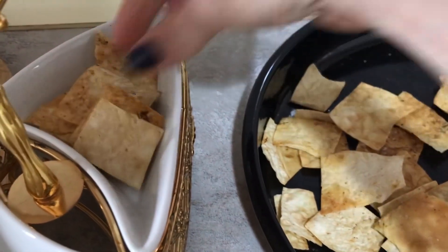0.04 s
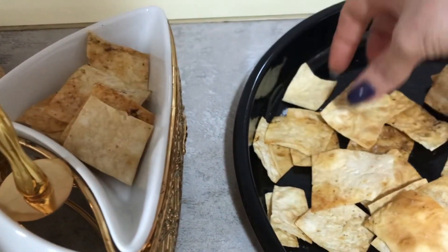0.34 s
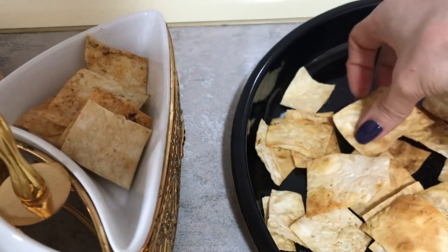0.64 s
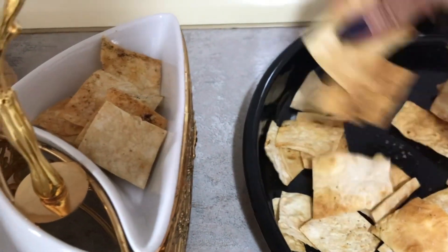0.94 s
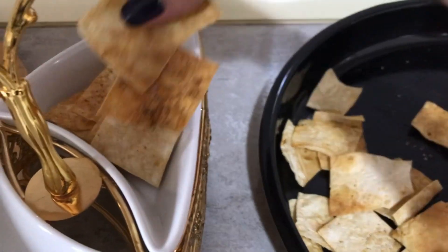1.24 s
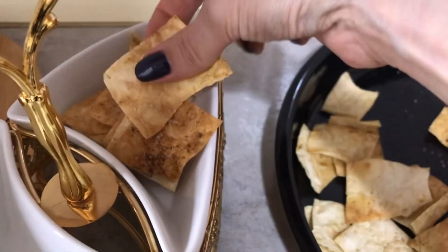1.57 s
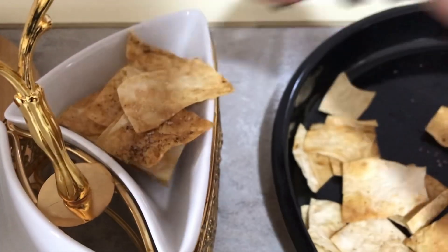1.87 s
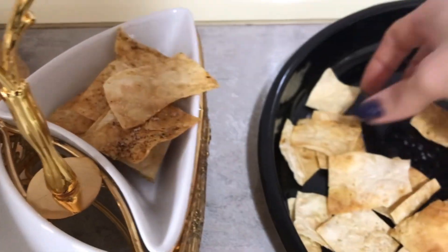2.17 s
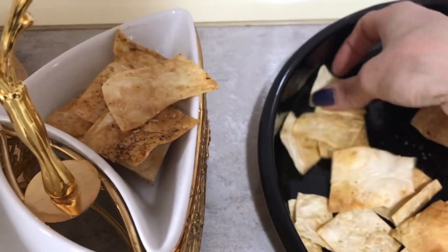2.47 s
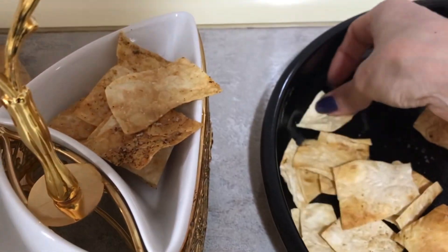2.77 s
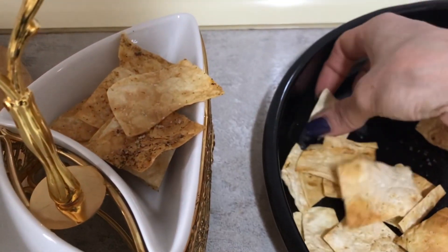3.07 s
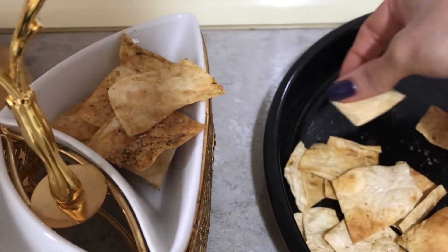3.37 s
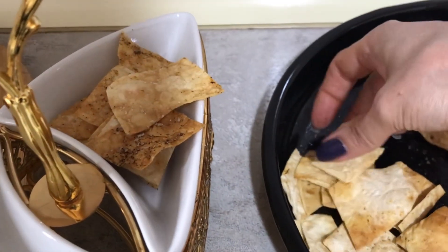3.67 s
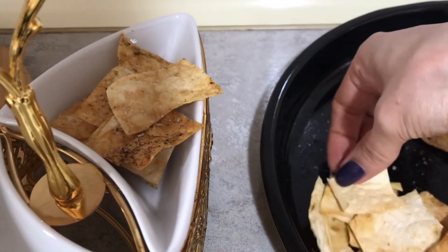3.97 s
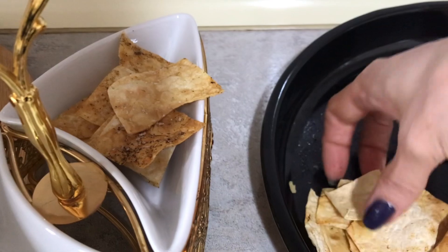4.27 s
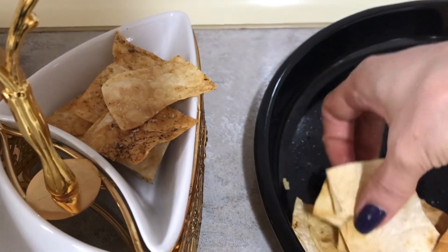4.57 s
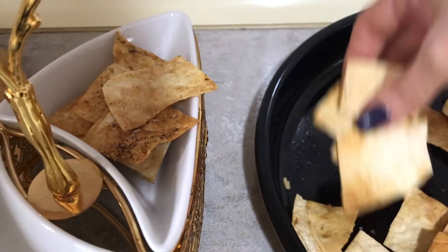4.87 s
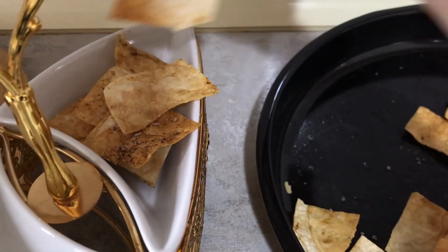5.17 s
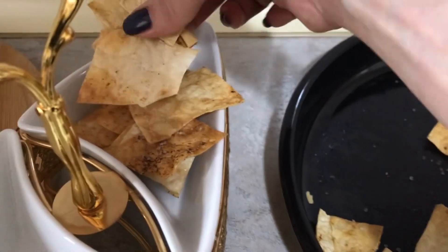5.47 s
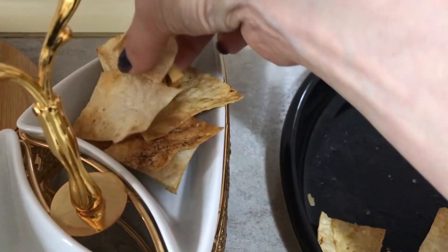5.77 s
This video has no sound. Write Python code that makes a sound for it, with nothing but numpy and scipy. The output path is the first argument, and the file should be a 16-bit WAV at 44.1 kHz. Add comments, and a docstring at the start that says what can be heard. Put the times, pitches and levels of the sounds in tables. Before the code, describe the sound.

Close by in a small kitchen, brittle crisps rustle and click as fingers pick them off a baking tray. One snaps as they are set down in a ceramic dish. More are scraped together, crackling busily while the metal knocks and rings faintly, then settle on the pile with light ticks and a soft, low bump of the dish. A faint hiss and a low appliance hum lie underneath.

```python
"""Dry baked crisps are gathered by hand from a baking tray and laid on a heap in a ceramic dish.
Their surfaces catch and slip many times a second, so they scrape, tick and crumble; a few crack sharply.
The metal tray drums and rings faintly under them, and the dish thuds softly when it is nudged.
Behind it all are a small kitchen's short echo, a faint hiss of air and the low hum of an appliance."""
import sys
import numpy as np
from scipy import signal
from scipy.fft import rfft, irfft, next_fast_len
from scipy.io import wavfile
from scipy.ndimage import uniform_filter1d, map_coordinates

SR = 44100
rng = np.random.default_rng(int(sys.argv[2]) if len(sys.argv) > 2 else 0)


def materialize(psi):
    """Save the field psi as 16-bit PCM at rate SR to the path in sys.argv[1].

    A 1-D psi becomes a single channel; in a 2-D psi each row is a channel.
    """
    bounded = np.clip(np.atleast_2d(psi).T, -1, 1)
    quanta = np.round(bounded * 32767).astype(np.int16)
    wavfile.write(sys.argv[1], SR, quanta)


N = 265482

# Levels are relative. A fade is the time a sound takes to drop by 60 dB.
# tone of the kitchen air: f/Hz, level/dB
AIR_TONE = [(25, -22), (60, -3.5), (110, -1), (220, -10.5), (460, -15), (2000, -26.5), (16000, -33.5)]
# loudness of the appliance over time: t/s, level/dB
HUM_LEVELS = [(0, -69), (2.2, -57), (4.1, -64.5), (6.02, -66.5)]
# how long the kitchen echoes: f/Hz, fade/s
ROOM_FADES = [(1000, 0.53), (15000, 0.29)]
# fingers and crisps nudging the dish: t/s, f/Hz, level/dB, fade/s
DISH_NUDGES = [(0.016, 270.6, -48, 0.43), (1.393, 293, -46.5, 0.1), (5.947, 74.6, -28, 0.31)]
# the notes the metal tray rings with: f/Hz, level/dB, fade/s
TRAY_NOTES = [(410, 10, .07), (905, 6, .1), (1107, 0, .65), (1290, -6, .25), (1506, -8, .95),
              (1895, -8, .7), (2155, -9, .35), (2846, -11, .55), (3234, -6, .3)]
# low notes of the tray's floor flexing on the counter: f/Hz, width/Hz, level/dB
FLOOR_NOTES = [(109, 16.6, -0.5), (136, 43, -11.5), (185, 11, -8.5)]
# the hand leaning on the tray: t/s, length/s, level/dB
HAND_PRESSES = [(0.575, 0.096, -48), (0.92, 0.097, -53), (2.5, 0.33, -55.5), (3.62, 0.18, -60),
                (3.87, 0.26, -54.5), (4.41, 0.44, -59)]
# a crisp flicking bare metal: t/s, level/dB, muted below f/Hz
TRAY_FLICKS = [(1.07, -52, 2070), (2.66, -45, 1250)]
# crisps set down on the tray: t/s, floor f/Hz, floor level/dB, wall level/dB
TRAY_KNOCKS = [(2.523, 402, -41, -56), (2.655, 395, -42, -52), (2.868, 420, -47, -61),
               (3.148, 340, -47, -41.5), (3.671, 412, -44, -41.5), (3.889, 452, -40.5, -49),
               (4.441, 373, -45, -44.5)]
# a crisp dragged on its edge: t/s, length/s, f/Hz, level/dB
EDGE_DRAGS = [(0.509, 0.099, 4400, -55), (2.474, 0.065, 3680, -50), (4.69, 0.08, 4430, -52)]
# crisps breaking, the first in four steps: t/s, level/dB
CRACK_STEPS = [(1.4487, -41.5), (1.4593, -37), (1.4668, -28.5), (1.4688, -21), (3.3436, -49), (3.9718, -44),
               (4.4388, -31), (5.5436, -47), (3.3436, -53), (3.9718, -43), (4.4388, -35), (5.5436, -52.5)]
# the notes of a breaking crisp: f/Hz, width/Hz, level/dB
SHARD_NOTES = [(3600, 2200, -14), (5310, 420, -4), (6440, 520, -1), (7290, 79, -0.5), (8900, 1200, -21),
               (11600, 1100, 4), (12900, 8500, -1.5)]
# tones of rubbing surfaces (rasp), whole crisps (body) and an edge letting go (snap): f/Hz, level/dB
TRAY_RASP_TONE = [(1100, -43.5), (2200, -5.5), (3000, 1), (4200, 0), (5000, -3.5), (6300, -1.5), (8800, -3),
                  (10400, -4.5), (12500, -3.5), (15000, -2), (16000, -18)]
DISH_RASP_TONE = [(1100, -34), (2200, -8.5), (3400, -3.5), (4600, -4), (6300, -2.5), (8000, -10.5),
                  (10500, -11.5), (12400, -6), (16000, -13)]
TRAY_BODY_TONE = [(140, -4), (250, -6), (430, 1.5), (600, -9.5), (900, 1), (1500, 0), (2100, -1),
                  (3200, -22)]
DISH_BODY_TONE = [(120, 0), (260, 4), (520, -13), (900, -10.5), (1300, 3), (2100, -4.5), (3200, -13.5)]
SNAP_TONE = [(1100, -25.5), (2200, -5), (3300, 1.5), (6500, -1), (8800, 1.5), (10300, -2), (12500, 2),
             (16000, -8.5)]
# fingers pushing the crisps along: t/s, length/s, rasp level/dB, body level/dB
TRAY_PUSHES = [(0.47, 0.13, -50, -57.5), (0.575, 0.081, -44.5, -53.5), (0.73, 0.228, -48, -63.5),
               (0.89, 0.17, -45.5, -52.5), (2.462, 0.08, -44, -56), (2.56, 0.12, -47, -55.5),
               (2.65, 0.034, -37.5, -46), (2.72, 0.051, -54, -63), (2.88, 0.02, -45, -59),
               (2.94, 0.11, -61, -62.5), (3.1, 0.18, -48, -56.5), (3.34, 0.041, -49.5, -71),
               (3.46, 0.043, -62, -71), (3.602, 0.021, -55, -54.5), (3.665, 0.28, -46, -55),
               (3.88, 0.22, -40.5, -49), (4.225, 0.0077, -44, -55.5), (4.3, 0.076, -54, -56.5),
               (4.365, 0.088, -48.5, -58), (4.41, 0.066, -37, -49), (4.48, 0.27, -44.5, -53.5),
               (4.79, 0.015, -49.5, -65)]
DISH_PUSHES = [(-0.01, 0.03, -41, -49.5), (0.08, 0.0093, -54.5, -74), (1.435, 0.031, -50.5, -52),
               (1.595, 0.06, -52.5, -62), (1.78, 0.027, -58, -67), (1.862, 0.1, -53.5, -59.5),
               (2.01, 0.026, -58, -63.5), (5.3, 0.16, -70, -79), (5.505, 0.069, -59, -76),
               (5.62, 0.0043, -44.5, -57), (5.67, 0.097, -56.5, -67), (5.745, 0.075, -44.5, -52),
               (5.83, 0.19, -51, -56), (5.96, 0.042, -41, -49)]
# edges catching: t/s, snap level/dB, knock level/dB, crumble fade/s, the crisp's main note f/Hz
TRAY_CATCHES = [(0.612, -39.5, -50, .045, 4400), (0.855, -38.5, -48.5, 0.061, 8500),
                (0.912, -34.5, -57.5, 0.044, 7400), (0.928, -34.5, -43, .033, 8600),
                (0.995, -37.5, -46, 0.031, 6510), (2.523, -37.5, -48.5, .038, 3730),
                (2.5866, -40.5, -59, 0.03, 13400), (2.6545, -32, -55, 0.084, 5570),
                (2.8026, -41.5, -43.5, .055, 3420), (2.8655, -37, -54, .035, 8500),
                (2.8852, -37, -57, 0.022, 8700), (2.9827, -44.5, -53, 0.016, 14500),
                (3.12, -36, -45.5, .02, 7360), (3.1473, -36, -45.5, 0.046, 4600),
                (3.2032, -38, -47, 0.032, 4400), (3.2631, -40.5, -57, 0.041, 11400),
                (3.3434, -44, -71, 0.037, 13800), (3.6567, -37, -62, .02, 3300),
                (3.6692, -32.5, -40, 0.16, 3300), (3.8882, -33, -49, 0.14, 4330),
                (3.958, -32, -61, 0.086, 3000), (3.97, -29, -56, .11, 14600),
                (4.0268, -31.5, -56, .025, 11300), (4.036, -34.5, -59.5, .025, 12500),
                (4.4386, -27, -40.5, 0.031, 7600), (4.469, -38.5, -49, .05, 5000),
                (4.6908, -36, -57, 0.084, 9600), (4.765, -37.5, -53, 0.048, 4200)]
DISH_CATCHES = [(1.1539, -56, -77, .01, 12900), (1.204, -53.5, -62, .01, 12600),
                (1.3943, -49.5, -48, 0.18, 3250), (1.6039, -42, -51.5, 0.21, 5850),
                (1.8059, -44, -46.5, 0.028, 15600), (1.8678, -45.5, -48, 0.086, 2570),
                (1.9047, -47.5, -44, .03, 4920), (4.9857, -45, -83, 0.024, 4650),
                (5.0156, -51, -73, 0.012, 4770), (5.3454, -49.5, -65, 0.059, 6230),
                (5.5365, -45, -70, 0.0056, 11600), (5.5434, -38, -53, 0.025, 11700),
                (5.5708, -40.5, -57, 0.073, 5850), (5.6217, -36.5, -53, 0.037, 3680),
                (5.711, -40, -50, 0.018, 13700), (5.9834, -41, -39.5, 0.013, 6600)]

GRIP_S, EASE_DB_PER_S = 0.0082, 6  # a push takes hold quickly, then eases off
RASP_SETTLE_DB_PER_S, BODY_SETTLE_DB_PER_S = 295, 180.5  # the rasp stops before whole crisps come to rest


def amp(db):
    """Turn decibels into a number to multiply by."""
    return 10 ** (np.asarray(db) / 20)


def unit(x):
    """Scale a sound to an average power of 1."""
    return x / np.sqrt(np.mean(x ** 2) + 1e-20)


def burst(x):
    """Scale a short sound to the energy of 10 ms at power 1."""
    return x * np.sqrt(SR / 100 / np.sum(x ** 2))


def along(points, hz):
    """Read between the rows of a (frequency, value) table, with octaves evenly spaced."""
    freqs, values = np.transpose(points)
    return np.interp(np.log(hz + 1), np.log(freqs + 1), values)


def wobble(rate):
    """A smooth curve through `rate` random values a second."""
    points = rng.standard_normal(int(N * rate / SR) + 4)
    coarse = map_coordinates(points, [np.arange(0, N + 32, 32) * rate / SR])
    return np.interp(np.arange(N) / 32, np.arange(len(coarse)), coarse)


def add(track, start, sound):
    """Mix a sound into a track at `start` seconds."""
    part = track[max(round(start * SR), 0):][:len(sound)]
    part += sound[:len(part)]


def through(x, response):
    """Pass a sound through an object, given that object's response to one tap."""
    return signal.oaconvolve(x, response)[:len(x)]


def resonances(notes, size=16384):
    """The response to one tap of an object with these notes; wider notes die sooner."""
    f = np.fft.rfftfreq(size, 1 / SR)
    return irfft(sum((-1) ** k * amp(db) * 1j * f * width / (hz * hz - f * f + 1j * f * width)
                     for k, (hz, width, db) in enumerate(notes)))


def background(air_db, hum_hz):
    """Still kitchen air and the unsteady hum of an appliance."""
    t = np.arange(N) / SR
    air_tone = amp(along(AIR_TONE, np.fft.rfftfreq(N, 1 / SR)))
    air = irfft(rfft(rng.standard_normal(N)) * air_tone, N)
    hum = unit(np.sin(2 * np.pi * hum_hz * t + .4 * wobble(5)))
    hum_db = np.interp(t, *np.transpose(HUM_LEVELS))
    return amp(air_db) * unit(air) + amp(hum_db) * hum


def near_echoes(x, fade, size=8192):
    """Quick echoes off tray and counter, whose pattern changes as the hand moves."""
    padded, track, t = np.pad(x, size), np.zeros(N + 2 * size), np.arange(SR // 10) / SR
    for start in range(0, N + size, size // 2):
        echoes = rng.standard_normal(len(t)) * amp(-60 * t / fade) * (t > .001)
        piece = padded[start:start + size] * np.hanning(size)
        add(track, start / SR, signal.fftconvolve(piece, echoes / np.linalg.norm(echoes)))
    return track[size:size + N]


def kitchen(x, near_db, near_fade, room_db):
    """A sound with its echoes: nearby surfaces answer at once, then the room follows weakly."""
    hz, t, noise = signal.stft(rng.standard_normal(SR // 2), SR, nperseg=256)
    tail = signal.istft(noise * amp(-60 * t / along(ROOM_FADES, hz)[:, None]), SR, nperseg=256)[1]
    room = through(x, np.pad(tail, (300, 0)) / np.linalg.norm(tail))
    return x + amp(near_db) * near_echoes(x, near_fade) + amp(room_db) * room


def dish_nudges():
    """Soft pushes on the dish make low thuds that swell over a cycle or two."""
    track, t = np.zeros(N), np.arange(SR // 3) / SR
    for start, hz, db, fade in DISH_NUDGES:
        swell = 1 - np.exp(-(hz * t) ** 2 / 2)
        add(track, start, amp(db - 60 * t / fade) * swell * np.sin(2 * np.pi * hz * t))
    return track


def push_curves(pushes, settle=(RASP_SETTLE_DB_PER_S, BODY_SETTLE_DB_PER_S)):
    """Fingers grip, slide and stop: one loudness curve per level column; the strongest push wins."""
    t = np.arange(0, N, 32) / SR
    start, length, *levels = np.transpose(pushes)[:, :, None]
    grip = np.clip((t - start) / GRIP_S, 0, 1)
    eased_db = EASE_DB_PER_S * np.clip(t - start, 0, length)
    since_end = np.clip(t - start - length, 0, 1)
    curves = [grip * amp(db - eased_db - rate * since_end) for db, rate in zip(levels, settle)]
    return [np.interp(np.arange(N) / SR, t, curve.max(axis=0)) for curve in curves]


def slips(rate, spread_db, size=N):
    """Surfaces catch and slip: about `rate` tiny random kicks a second, some bigger than others."""
    happens = rng.random(size) < rate / SR
    direction = np.sign(rng.standard_normal(size))
    strength = amp(spread_db * np.minimum(rng.standard_normal(size), 2))
    return unit(happens * direction * strength)


def tray_drumming():
    """The tray's floor shudders with a low sound as the hand leans on it."""
    pressure = push_curves(HAND_PRESSES, settle=[BODY_SETTLE_DB_PER_S])[0]
    return pressure * unit(through(slips(rate=600, spread_db=3.3), resonances(FLOOR_NOTES)))


def tray_flicks(mute_db_per_octave=19):
    """A crisp flicks bare metal and the tray rings; the load on it mutes the low notes."""
    track, t = np.zeros(N), np.arange(SR) / SR
    for start, flick_db, muted_hz in TRAY_FLICKS:
        for hz, db, fade in TRAY_NOTES:
            mute_db = mute_db_per_octave * max(np.log2(muted_hz / hz), 0)
            add(track, start, amp(flick_db + db - mute_db - 60 * t / fade) * np.sin(2 * np.pi * hz * t))
    return track


def tray_knocks(wall_hz=918, fade=0.1):
    """A crisp set down makes the tray's floor and wall knock; the floor's pitch shifts with the load on the
    tray."""
    track, t = np.zeros(N), np.arange(SR // 2) / SR
    for start, floor_hz, floor_db, wall_db in TRAY_KNOCKS:
        floor = amp(floor_db) * np.sin(2 * np.pi * floor_hz * t)
        wall = amp(wall_db) * np.sin(2 * np.pi * wall_hz * t)
        swell = 1 - np.exp(-floor_hz * t)
        add(track, start, (floor + wall) * swell * amp(-60 * t / fade))
    return track


def crisp_note(force, hz):
    """A force makes one note of a crisp ring."""
    return through(force, resonances([(hz, hz / 15, 0)], size=1024))


def crisp_response(tone, ripple_db=2.5, width_hz=250, size=2048):
    """How one crisp answers a tap: a broad tone with random peaks of its own."""
    hz = np.fft.rfftfreq(size, 1 / SR)
    peaks = map_coordinates(rng.standard_normal(256), [hz / width_hz], mode="wrap")
    spectrum = amp(along(tone, hz) + ripple_db * peaks)
    # keep this tone, but make the sound come right after the tap and never before it
    folded = irfft(np.log(spectrum + 1e-6))
    folded[1:size // 2] *= 2
    folded[size // 2 + 1:] = 0
    response = irfft(np.exp(rfft(folded)))
    return response / np.linalg.norm(response)


def edge_drags():
    """A crisp dragged on its edge sings briefly, as quick slips keep one note going."""
    track, t = np.zeros(N), np.arange(SR // 2) / SR
    for start, length, hz, db in EDGE_DRAGS:
        note = unit(crisp_note(rng.standard_normal(len(t)), hz))
        grip = np.clip(np.minimum(t, length - t) / GRIP_S, 0, 1)
        add(track, start, amp(db) * note * grip)
    return track


def cracks(fade=0.048):
    """A pressed crisp breaks; each step is a sharp kick and a fading hiss that ring its high notes."""
    track, t = np.zeros(N), np.arange(SR // 20) / SR
    low_cut = signal.butter(2, 4200, "high", fs=SR)  # so small a piece gives off little bass
    for start, db in CRACK_STEPS:
        force = amp(-32.5 - 60 * t / fade) * rng.standard_normal(len(t))
        force[0] += 1
        ring = through(force, resonances(SHARD_NOTES))
        add(track, start, amp(db) * burst(signal.lfilter(*low_cut, ring)))
    return track


def ticks(catches, body_tone, sharpness, snap_db, knock_db, knock_fade, ring_db):
    """A caught edge lets go with a snap, a dying run of crumbs and a duller knock of the whole crisp."""
    track, t = np.zeros(N), np.arange(SR // 6) / SR
    for start, snap_level, knock_level, crumble_fade, hz in catches:
        force = slips(rate=7000, spread_db=1.5, size=len(t)) * amp(-60 * t / crumble_fade)
        force[0] += sharpness * np.linalg.norm(force)
        # baked dough soaks up vibration, so its main note dies within milliseconds
        ring = burst(through(force, resonances([(hz, 400 + hz / 10, 0)], size=1024)))
        crumbs = burst(through(force, crisp_response(SNAP_TONE)))
        snap = burst(crumbs + amp(ring_db) * ring)
        jolt = rng.standard_normal(len(t)) * amp(-60 * t / knock_fade)
        knock = burst(through(jolt, crisp_response(body_tone)))
        add(track, start, amp(snap_level + snap_db) * snap + amp(knock_level + knock_db) * knock)
    return track


def scrape(tone, rate, waver_db, count=8):
    """Several crisps rub in short runs of slips; the hand's push wavers for all of them together."""
    crisps = np.zeros(N)
    for _ in range(count):
        rub = unit(through(slips(rate, spread_db=4), crisp_response(tone, ripple_db=3.4, width_hz=450)))
        crisps += rub * amp(6 * wobble(18) + 6 * wobble(110))
    loudness = np.sqrt(np.abs(uniform_filter1d(crisps ** 2, size=400)) + 1e-9)
    return unit(crisps / loudness * amp(waver_db * wobble(150)))


def rasp(tone, rate, waver_db, count=420):
    """Rough surfaces rub, with small crackles that each have their own pitch and strength."""
    crackles, t = np.zeros(N), np.arange(SR // 20) / SR
    starts = rng.random(count) * N / SR
    for start, (octaves, strength) in zip(starts, rng.uniform(-1, 1, (count, 2))):
        force = rng.standard_normal(len(t)) * amp(-60 * t / .025)
        add(crackles, start, amp(6 * strength) * burst(crisp_note(force, 4400 * 2 ** octaves)))
    return unit(scrape(tone, rate, waver_db) + amp(-10) * unit(crackles))


def crisps_in_dish():
    """Crisps slide and tick on the heap; the heavy ceramic adds no ring."""
    rasp_curve, body_curve = push_curves(DISH_PUSHES)
    contact = rasp_curve * rasp(DISH_RASP_TONE, rate=1000, waver_db=4.0)
    contact += body_curve * scrape(DISH_BODY_TONE, rate=600, waver_db=0.5)
    return contact + ticks(DISH_CATCHES, DISH_BODY_TONE, sharpness=0.348,
                           snap_db=-2.5, knock_db=-3.5, knock_fade=0.055, ring_db=0.0)


def crisps_on_tray():
    """Crisps scrape and tick on the tray, and the metal rings faintly along."""
    rasp_curve, body_curve = push_curves(TRAY_PUSHES)
    contact = rasp_curve * rasp(TRAY_RASP_TONE, rate=1100, waver_db=2.0)
    contact += amp(-0.5) * body_curve * scrape(TRAY_BODY_TONE, rate=500, waver_db=2.5)
    contact += ticks(TRAY_CATCHES, TRAY_BODY_TONE, sharpness=0.21,
                     snap_db=-1.5, knock_db=-1.5, knock_fade=0.13, ring_db=-5.5)
    t = np.arange(SR) / SR
    ring = sum(amp(db - 60 * t / fade) * np.sin(2 * np.pi * hz * t) for hz, db, fade in TRAY_NOTES)
    return contact + amp(-57) * through(contact, ring)


def scene():
    """All the handling, heard in the kitchen; the cracks are closest and have the least echo."""
    tray = crisps_on_tray() + tray_drumming() + tray_knocks() + tray_flicks()
    handling = kitchen(tray + edge_drags() + crisps_in_dish(), near_db=-7.5, near_fade=.035, room_db=-15)
    breaking = kitchen(cracks(), near_db=-21.5, near_fade=0.089, room_db=-20)
    return (handling + breaking + dish_nudges() + background(air_db=-63, hum_hz=41.2))[None]


def record(dry):
    """Cut away the very highest treble."""
    top_hz, size = 16000, next_fast_len(N + 8192)
    cut_db = np.clip((np.fft.rfftfreq(size, 1 / SR) - top_hz) / 10, 0, 120)
    return irfft(rfft(dry, size) * amp(-cut_db), size)[..., :N]


dry = scene()
out = record(dry)
materialize(out)
```